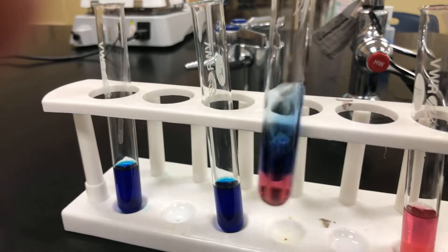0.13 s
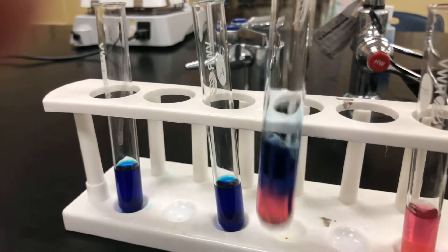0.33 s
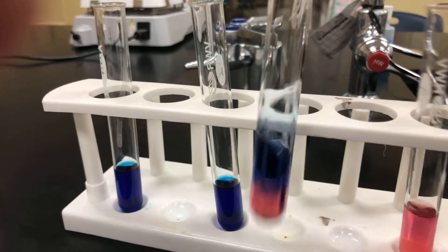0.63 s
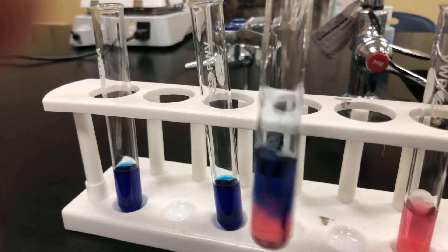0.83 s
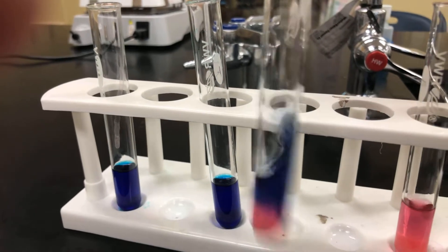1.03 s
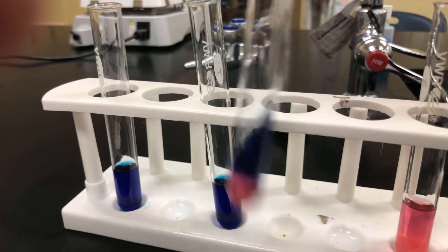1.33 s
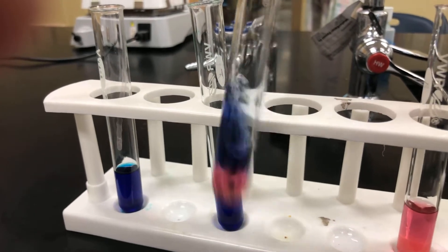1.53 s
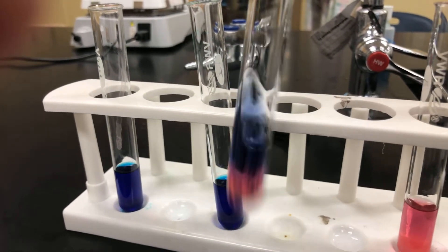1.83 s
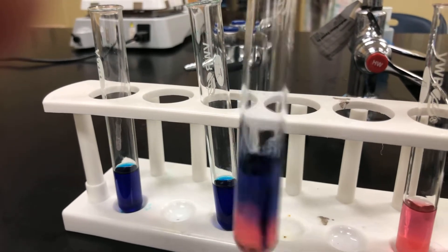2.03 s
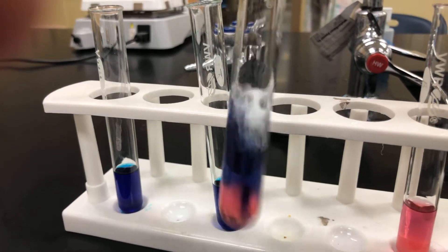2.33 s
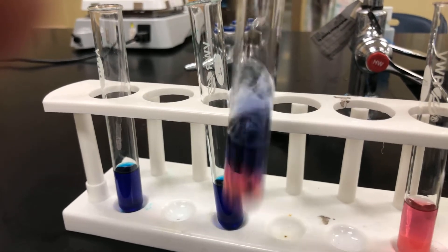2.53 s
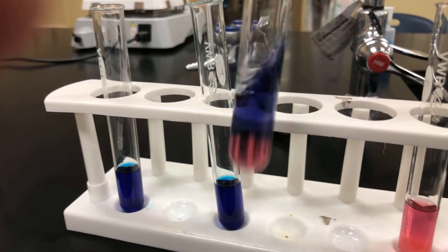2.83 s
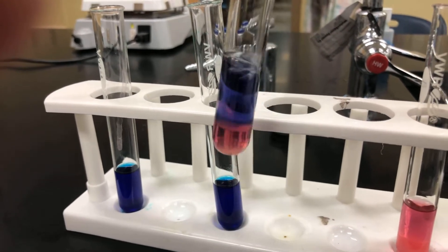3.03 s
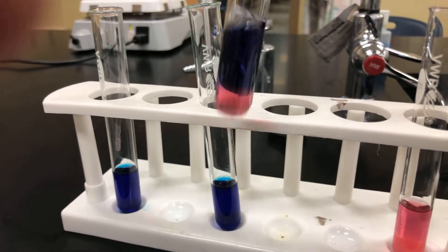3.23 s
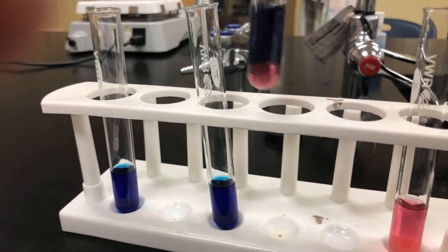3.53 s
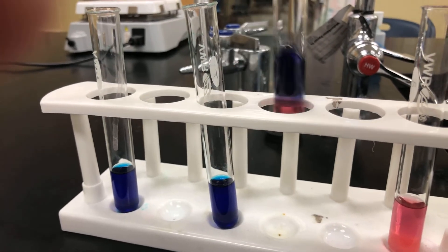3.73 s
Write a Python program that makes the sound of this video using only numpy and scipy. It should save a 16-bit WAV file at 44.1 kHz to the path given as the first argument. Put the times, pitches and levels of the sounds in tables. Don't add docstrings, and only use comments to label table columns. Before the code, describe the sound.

Close to the microphone, glass clacks against a hollow plastic rack four times in the first second, with rattling rebounds; afterwards sparse, very quiet taps and ticks sit in a small room's electrical hum and ventilation.

```python
import sys
import numpy as np
from scipy import signal
from scipy.fft import rfft, irfft, next_fast_len
from scipy.io import wavfile
from scipy.ndimage import map_coordinates

SR = 44100
rng = np.random.default_rng(int(sys.argv[2]) if len(sys.argv) > 2 else 0)


def to_wav(sig):
    pcm = np.clip(np.atleast_2d(sig), -1, 1) * 32767
    pcm = np.round(pcm).astype(np.int16)
    wavfile.write(sys.argv[1], SR, pcm.T)


def invert_db(x):
    u = np.asarray(x, float) / 20
    return 10 ** u


N = 171990
T = np.arange(SR // 4) / SR
RISE_S, HISS_TOP_HZ = .0002, 15600
RACK_DETUNE, GLASS_DETUNE = .008, .001


def unit(x):
    return x / np.sqrt(np.mean(x ** 2) + 1e-20)


def along(points, hz):
    f, v = np.transpose(points)
    return np.interp(np.log(hz + 1), np.log(f + 1), v)


def curve(rows):
    return np.interp(np.arange(N) / SR, *np.transpose(rows))


def wobble(knots_per_s):
    return map_coordinates(rng.standard_normal(N // 100), [np.arange(N) * knots_per_s / SR])


def noise(response, size):
    m = next_fast_len(size)
    spectrum = rfft(rng.standard_normal(m)) * response(np.fft.rfftfreq(m, 1 / SR))
    return unit(irfft(spectrum, m)[:size])


def ring(modes, scatter_db, detune, climb=0):
    rows = [(*m, RISE_S)[:4] for m in modes]
    hz, db, t60, rise = np.transpose(rows)[:, :, None]
    z = rng.standard_normal((2, len(modes), 1))
    level = invert_db(db + scatter_db * z[0] - 60 * T / t60) * (1 - np.exp(-T / rise))
    phase = 2 * np.pi * hz * (1 + detune * z[1]) * (T + climb * T ** 3)
    return (level * np.sin(phase)).sum(0)


def burst(spectrum):
    puff = noise(lambda hz: invert_db(along(spectrum, hz)), len(T))
    fizz = noise(lambda hz: invert_db(along(spectrum, hz)) * (hz < HISS_TOP_HZ), len(T))
    puff_t60_s, fizz_t60_s, fizz_db = .008, .085, -25
    both = puff * invert_db(-60 * T / puff_t60_s) + fizz * invert_db(fizz_db - 60 * T / fizz_t60_s)
    return both * (1 - np.exp(-T / RISE_S))


def flutter():
    depth_db, knots_per_s = 3.5, 130
    return invert_db(depth_db * map_coordinates(rng.standard_normal(len(T) // 100), [T * knots_per_s]))


# f/Hz, T60/s
LAB_DECAY = [(300, 0.29), (2000, 0.28), (6000, 0.11), (15000, 0.058), (15900, .05), (16200, .006)]


def add(track, s, sound):
    hz, t, z = signal.stft(rng.standard_normal(len(T)), SR, nperseg=256)
    decay = invert_db(-60 * t / along(LAB_DECAY, hz)[:, None])
    tail = signal.istft(z * decay, SR, nperseg=256)[1][:len(T)]
    delayed = np.pad(sound, (200, 0))
    wet = signal.fftconvolve(delayed, tail / np.linalg.norm(tail))[:len(T)]
    track[round(s * SR):][:len(T)] += sound + invert_db(-21.5) * wet


# t/s, crack level/dB, 5 kHz ring/dB, 11 kHz ring/dB, 14 kHz ring/dB
CLINKS = [(0.1042, -32.5, -44, -52.5, -72), (0.218, -10, -18.5, -25, -47), (0.2484, -60.5, -31, -74, -54),
          (0.3914, -14.5, -30, -25.5, -53), (.3965, -45, -36, -60.5, -50), (.4780, -70, -55, -83, -65),
          (0.5302, -9.5, -19.5, -31, -54), (0.698, -61, -50.5, -73, -70), (.5398, -22, -29, -60, -60),
          (0.7059, -13.5, -18, -28, -37), (.7120, -44, -34, -59, -51), (0.756, -37.5, -35, -63, -44.5),
          (0.792, -51, -38, -78, -58), (.9175, -61, -53, -87, -68.5), (1.613, -62.5, -62.5, -89.5, -81),
          (1.9808, -66, -77, -60, -84.5), (2.3010, -57, -77, -70, -84), (2.6208, -54, -88, -60, -86.5),
          (3.6605, -53.5, -88, -81, -82), (3.7196, -60, -75.5, -69, -77), (3.7255, -75, -66, -85, -73),
          (3.867, -58, -57.5, -78, -70)]
# f/Hz, level/dB
CRACK = [(600, -34), (2000, -30.5), (5300, 8), (6800, -2.5), (7900, 1), (10000, -5), (13500, 2),
         (16500, -13.5)]
# f/Hz, level/dB, T60/s
GLASS_5K = [(5290, 0, .018), (5262, -22, .12), (5305, -24, .1), (5650, -8, .012)]
GLASS_11K = [(11485, 0, 0.062), (11560, -30, 0.15)]
GLASS_14K = [(13880, 0, .07), (14680, -2, .045), (13100, -10, .06)]


def clinks(track):
    groups = [(GLASS_5K, 0), (GLASS_11K, 3.8), (GLASS_14K, 0)]  # modes, climb/s^-2
    for s, crack_db, *ring_db in CLINKS:
        sound = invert_db(crack_db) * burst(CRACK)
        for db, (modes, climb) in zip(ring_db, groups):
            sound = sound + invert_db(db) * flutter() * ring(modes, 0.98, GLASS_DETUNE, climb)
        add(track, s, sound)


# t/s, level/dB, f/Hz, T60/s, beat/Hz
SLIDES = [(.258, -46, 5250, .15, 44), (.556, -46, 5250, .24, 34), (.7075, -37, 5290, .09, 12),
          (.7565, -28, 5300, .052, 6), (.7915, -52, 5255, .19, 50), (1.614, -64, 5280, .1, 20),
          (2.631, -58, 855, .13, 9), (3.7255, -55, 5275, .1, 70), (3.752, -64, 5255, .3, 30),
          (3.722, -73, 11540, .1, 30), (3.812, -72, 11560, .2, 24), (.9185, -62, 5290, .07, 10)]


def slides(track):
    rise_s = .0015
    for s, db, hz, t60, beat_hz in SLIDES:
        pair = [(hz, 0, t60, rise_s), (hz + beat_hz, -5, t60, rise_s)]
        add(track, s, invert_db(db) * flutter() * ring(pair, 0, 0))


# t/s, base/dB, posts/dB, shelf/dB, edge/dB
RATTLES = [(.1050, -34.5, -32.5, -36, -56.5), (.2192, -26, -23, -16, -36), (.2240, -24, -24.5, -27.5, -42),
           (.2297, -20.5, -25, -27.5, -23), (.2431, -26.5, -35.5, -42.5, -36.5),
           (.2493, -37.5, -42, -34, -32), (.2517, -24.5, -23.5, -28.5, -17.5),
           (.2579, -32.5, -33, -40.5, -29), (.2624, -31, -41, -35.5, -28), (.3922, -21.5, -24, -19.5, -36),
           (.3965, -30, -32, -39.5, -33.5), (.4075, -22, -40, -46, -56), (.4176, -39, -36.5, -40.5, -33),
           (.4211, -28, -24, -25, -20.5), (.4280, -34, -32.5, -40, -34.5),
           (.4515, -35.5, -37.5, -41.5, -41.5), (.5309, -19.5, -22.5, -17.5, -37.5),
           (0.5398, -16, -19.5, -21.5, -18), (.5520, -31.5, -33, -30.5, -36.5),
           (.5642, -22, -24.5, -25, -21.5), (.5751, -28.5, -38, -41.5, -46), (.5945, -47, -48, -56, -60),
           (.6970, -48, -43, -46.5, -72), (.7065, -38, -30, -19, -37), (.7110, -25, -25, -46, -28.5),
           (.7280, -48, -50, -42.5, -28.5), (.7325, -36.5, -36, -46, -29.5), (.7565, -32, -33, -28, -53),
           (.7700, -39.5, -38, -54, -59), (.7765, -47, -47, -42, -36.5), (.7910, -47, -48, -43.5, -45)]
# t/s, base/dB, posts/dB, shelf/dB, edge/dB
BRUSHES = [
    (.9730, -59.5, -74.5, -75.5, -79.5),
    (1.6125, -56.5, -52.5, -54, -55.5),
    (2.6220, -65, -50, -48.5, -77.5),
    (3.722, -44.5, -61, -50.5, -79.5),
    (3.7760, -51, -66, -66, -75),
]
# f/Hz, level/dB, T60/s, rise/s
BASE = [(530, -15, 0.04, 0.0019), (617, 0.5, 0.043, 0.0034), (665.4, -1.5, 0.059, 0.0034),
        (740.3, -5, 0.086, 0.0069), (770, 1, 0.045, 0.0013), (805, -7, 0.044, 0.0039),
        (913, 1, 0.031, 0.0021), (1010, -1, 0.026, 0.0011), (1204, -12.5, 0.084, 0.006)]
POSTS = [(1393, -5, 0.041, 0.0034), (1600, -12, 0.035, 0.00074), (1767, -1.5, 0.018, 0.0016),
         (1829, -2.5, 0.027, 0.00078)]
SHELF = [(2008, 0.5, 0.025, 0.0029), (2192, 7.5, 0.015, 0.0018), (2555, -14, 0.046, .002),
         (2944, -8, 0.016, 0.00031), (3160, -15, 0.029, 0.00074)]
# f/Hz, level/dB
EDGE = [(1200, -22), (2500, -2), (3600, 0), (5200, -3), (6800, -22), (10000, -26), (15700, -42),
        (16100, -90)]


def rack(track):
    for s, base_db, posts_db, shelf_db, edge_db in RATTLES + BRUSHES:
        sound = invert_db(base_db + 1.5) * ring(BASE, 2, RACK_DETUNE)
        sound += invert_db(posts_db + 5) * ring(POSTS, 2, RACK_DETUNE)
        sound += invert_db(shelf_db + 5) * ring(SHELF, 2, RACK_DETUNE)
        add(track, s, sound + invert_db(edge_db) * burst(EDGE))


# t/s, level/dB, f/Hz
SLAPS = [
    (.2235, -12, 616),
    (.2520, -21, 834),
    (.4085, -26, 655),
    (.4215, -19.5, 797),
    (.5325, -19, 695),
    (.5650, -25.5, 753),
    (.7125, -28, 630),
]


def slaps(track):
    t60_s, rise_s = .035, .00096
    for s, db, hz in SLAPS:
        add(track, s, invert_db(db) * ring([(hz, 0, t60_s, rise_s)], 0, 0))


# t/s, level/dB
THUDS = [
    (.222, -28),
    (0.392, -41),
    (.536, -29.5),
    (.709, -42),
]
# f/Hz, level/dB, T60/s, rise/s
BENCH = [(218, 0, .07, 0.006), (337, 4.5, 0.067, 0.0058), (430, -6, .05, 0.004)]


def thuds(track):
    for s, db in THUDS:
        add(track, s, invert_db(db) * ring(BENCH, 1, RACK_DETUNE))


# t/s, level/dB, f/Hz
DROPS = [
    (1.479, -58, 4260),
    (1.980, -36.5, 15020),
    (2.007, -61.5, 3970),
    (2.622, -48, 9500),
    (2.621, -50, 1140),
    (2.632, -54, 864),
    (1.615, -54, 1104),
    (3.627, -44, 5420),
    (3.7205, -51, 9400),
    (3.723, -42.5, 1820),
]


def drops(track):
    for s, db, hz in DROPS:
        t60 = 50 / hz
        add(track, s, invert_db(db) * ring([(hz, 0, t60), (0.935 * hz, -4, t60)], 1, GLASS_DETUNE))


def contacts():
    track = np.zeros(N + SR)
    for source in (clinks, slides, rack, slaps, thuds, drops):
        source(track)
    return signal.sosfilt(signal.butter(2, 150, "high", fs=SR, output="sos"), track[:N])


# t/s, level/dB
HUM = [(0.0, -30), (0.03, -40), (0.38, -38.5), (0.42, -43.5), (0.5, -36.5), (0.57, -41.5), (1.4, -43.5),
       (1.5, -39), (1.75, -46), (1.77, -44.5), (2.01, -43), (2.1, -48), (2.38, -40.5), (2.53, -47.5),
       (2.77, -40.5), (3.5, -44.5), (3.87, -39.5), (3.9, -39)]


def hum():
    wander_rad = .45 * wobble(5.7)
    phase = 2 * np.pi * 120 * np.arange(N) / SR + wander_rad
    return np.sqrt(2) * invert_db(curve(HUM) + 0.17 * wobble(8.5)) * np.sin(phase)


# f/Hz, width/Hz, level/dB
DRONES = [(90, 4.4, -61), (169.8, 2.2, -59), (228.2, 14, -60), (360, 2.4, -67), (2030, 270, -69)]
# f/Hz, level/dB per Hz
RUMBLE = [(13, -62), (22, -41.5), (64, -13.5), (89, -23), (119, -3), (173, -12), (355, -11), (600, -45.5),
          (780, -59.5), (1320, -120)]
# f/Hz, level/dB per Hz
AIR = [(350, 6.5), (550, 2), (1300, -5), (1750, 0), (2300, 0.5), (3000, -10.5), (5000, -17), (16000, -26)]
# t/s, level/dB
GAIN = [(0, 1.5), (.6, 3.5), (.75, 1.5), (.9, -2.5), (1.1, -2.5), (1.4, -0.5), (3.9, -0.5)]


def ventilation():
    room = invert_db(-82.5) * np.sin(2 * np.pi * 7870 * np.arange(N) / SR)
    for hz, width_hz, db in DRONES:
        room += invert_db(db) * noise(lambda f: 1 / (1 + ((f - hz) / width_hz * 2) ** 2), N)
    room += invert_db(-53 + 0.43 * wobble(9)) * noise(lambda f: invert_db(along(RUMBLE, f)), N)
    air = noise(lambda f: invert_db(along(AIR, f)) * (f > 300) * (f < HISS_TOP_HZ), N)
    room += invert_db(-62 + 0.42 * wobble(22)) * air
    return invert_db(curve(GAIN)) * room


def scene():
    return (contacts() + hum() + ventilation())[None]


def roll_off(x):
    return signal.sosfilt(signal.butter(12, 17150, fs=SR, output="sos"), x)


def record(dry):
    limit = .5
    limited = limit * np.tanh(dry / limit)
    mix = signal.sosfilt(signal.butter(10, 16500, fs=SR, output="sos"), limited)
    return roll_off(mix)


dry = scene()
out = record(dry)
to_wav(out)
```